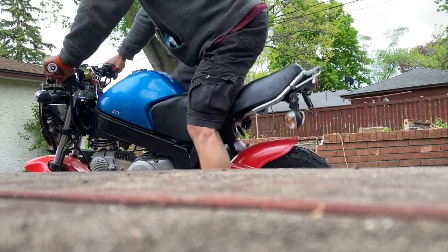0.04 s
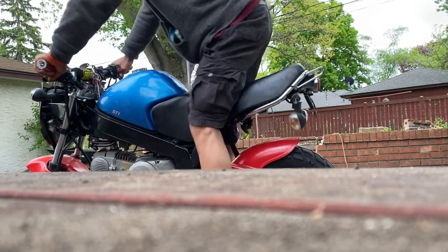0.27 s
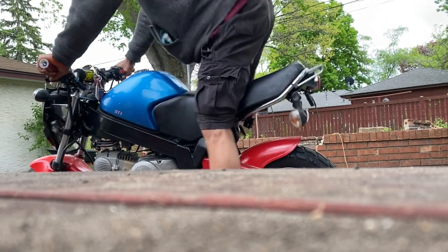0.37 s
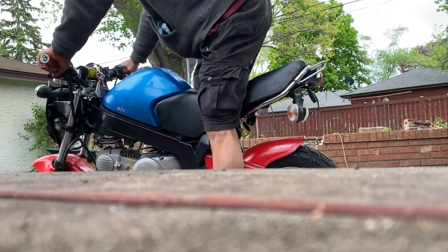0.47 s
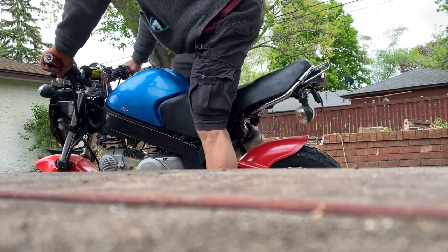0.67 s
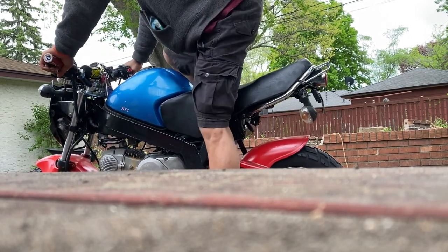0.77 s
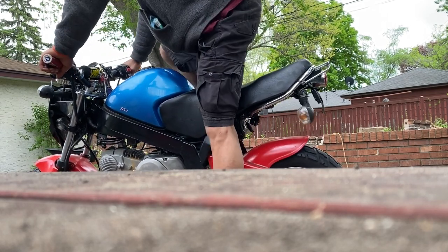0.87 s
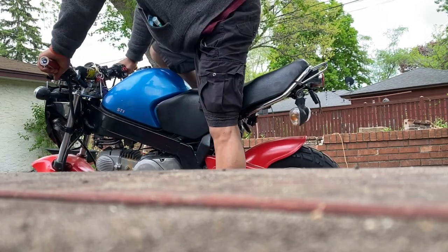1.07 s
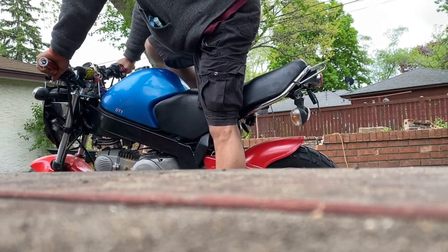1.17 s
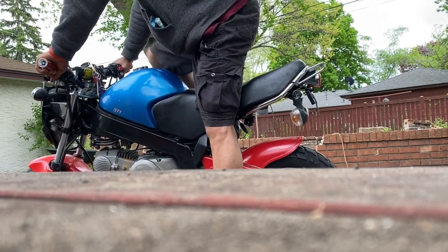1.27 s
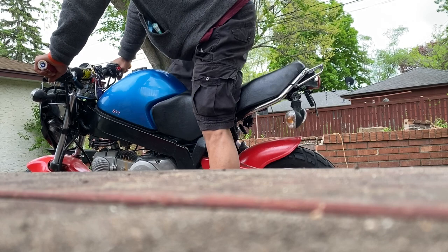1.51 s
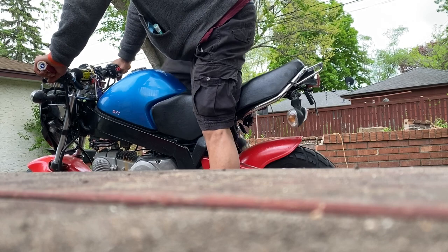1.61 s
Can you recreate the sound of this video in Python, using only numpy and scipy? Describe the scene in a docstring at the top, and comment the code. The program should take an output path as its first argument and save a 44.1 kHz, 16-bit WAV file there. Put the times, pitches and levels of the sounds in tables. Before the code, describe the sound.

Motorcycle kick-start attempt: a brief sputter, a hiss, then the lever clicking back.

```python
"""A small single-cylinder motorcycle is kicked over in a driveway. From 0.2 s six exhaust puffs boom
in the pipe over the clatter of gears, valves and ratchet. At 0.67 s it stalls and air hisses out.
From 1.2 s the kick lever clicks and scrapes back, with a second, short hiss. Throughout, a far motor
hums in the neighbourhood's low rumble. A two-port microphone lies on the ground."""
import sys
import numpy as np
from scipy import signal
from scipy.fft import rfft, irfft
from scipy.io import wavfile
from scipy.ndimage import uniform_filter1d

SR = 44100
rng = np.random.default_rng(int(sys.argv[2]) if len(sys.argv) > 2 else 0)


def log_audio(samples):
    """Write samples as a 16-bit WAV file to the path given in sys.argv[1]."""
    # one column per channel
    frames = np.atleast_2d(samples).T
    # limit to full scale, then quantise
    limited = np.clip(frames, -1, 1)
    pcm = np.round(limited * 32767).astype(np.int16)
    wavfile.write(sys.argv[1], SR, pcm)


N = 72765

# start_s, level_db, open_hz, flow_hz, outflow_s, overtone_db, ring_db, roar_db
EXHAUST_PUFFS = [(0.209, -1.5, 252, 86, 0.022, -10.5, -10.5, -15),
                 (0.278, -6, 59.6, 123, 0.03344, -13, -51, -29.5),
                 (.344, -2, 101, 92.5, .018, -11.5, -16.5, -28.5),
                 (0.4178, -4, 99, 93.1, 0.029, -9, -17, -33.5),
                 (0.52, -4.5, 83.6, 91, 0.0188, -16, -44, -45),
                 (0.6233, -7, 208.3, 99.3, 0.021, -12.5, -38, -34)]
# turbulent gas: freq_hz, gain_db
ROAR_SPECTRUM = [(88, -36), (150, -1.5), (668, -17), (735, -22), (927, -21.5), (1080, -44), (1500, -67),
                 (3300, -120)]
# gears, chain, valves: time_s, level_db, treble_db
CLATTER_ENVELOPE = [(0.0, -65.5, -3), (0.111, -42, -2.5), (0.146, -61, 3), (0.164, -50, 12),
                    (0.173, -49, 0), (0.212, -25, -0.5), (0.256, -30, 5), (0.302, -28.5, 5),
                    (0.412, -32.5, 1), (0.477, -33, 0), (0.482, -36, 2.5), (0.583, -33, -1.5),
                    (0.612, -41, 2), (0.676, -39, -0.5), (0.696, -43, -21), (0.715, -46.5, 12),
                    (0.76, -56, 5.5)]
# ratchet travel: time_s, teeth_passed
RATCHET_TEETH = [(.19, -1), (.206, 0), (.242, 2), (.272, 3), (.284, 4), (.339, 10), (.407, 16), (.474, 21),
                 (.53, 25), (.561, 27), (.598, 29)]
# broad part of the knocks: freq_hz, gain_db
KNOCK_SPECTRUM = [(240, -5), (400, -1), (1110, -11), (1670, -5.5), (4510, -15), (5570, -20), (7420, -15),
                  (9160, -34.5), (9580, -26.5), (11000, -23), (14600, -30)]
# engine case and lever: pitch_hz, width_hz, level_db
CASE_MODES = [(681, 29, -2.5), (921, 40, -3), (1668, 20, 0.5), (1736, 25, -2.5), (2147, 70, -5),
              (2235, 17, 4), (2700, 30, -2.5), (3172, 32, -3.5), (3940, 83, -12), (4560, 260, -13),
              (6150, 37, -8), (6574, 83, -12.5), (7580, 150, -17)]
# load shifts acting on nearby modes: time_s, centre_hz, half_length_s, gain_db
LOAD_SURGES = [(0.23, 935, 0.017, -2), (0.237, 3060, 0.024, 8), (0.244, 6340, 0.0065, 9),
               (0.297, 1570, 0.011, 7), (0.33, 4000, .03, 6.5), (0.375, 6160, 0.021, 11),
               (0.407, 4660, 0.013, 10), (0.454, 1880, 0.032, 13), (0.529, 6700, 0.017, 13),
               (.565, 1770, 0.023, 11.5), (0.576, 7250, 0.035, 10.5)]
# start_s, ring_db, pitch_hz, tick_db, thud_db
LEVER_CLICKS = [(0.1595, -46.5, 1480, -41, -60), (0.18, -35, 3350, -33.5, -68),
                (0.2027, -23, 2320, -35, -24.5), (0.208, -26, 7550, -27, -46), (.219, -18, 905, -52, -43),
                (.2424, -36, 6030, -59, -62), (.2723, -25, 1580, -40, -53), (.288, -41, 1660, -23, -58),
                (.3027, -18, 2430, -34, -64), (0.321, -31, 4580, -24.5, -46), (.4733, -44, 2250, -41, -60),
                (.5142, -31, 2170, -53, -66), (.5297, -22.5, 2115, -25, -70), (.5796, -35, 1624, -35, -66),
                (.622, -25.5, 428.4, -60, -66), (1.167, -46, 1667, -45, -51), (1.287, -49, 1810, -43, -75),
                (1.299, -37, 1670, -47, -39.5), (1.3312, -45, 4600, -39, -50.5),
                (1.437, -34, 927, -56, -51), (1.504, -56, 1520, -44, -50.5),
                (1.518, -42.5, 5070, -47, -48.5), (1.554, -46, 3360, -61, -82)]
# bright part of a click: freq_hz, gain_db
TICK_SPECTRUM = [(600, -14), (1500, 10.5), (4500, 3), (8000, -12), (10000, -28), (14000, -32)]
# dull part of a click: freq_hz, gain_db
THUD_SPECTRUM = [(120, -42), (250, 5.5), (650, 1), (1200, -12.5), (3000, -42)]
# returning lever: time_s, level_db
SCRAPE_ENVELOPE = [(1.352, -51.5), (1.366, -42), (1.441, -39.5), (1.46, -47.5), (1.47, -41), (1.49, -45.5),
                   (1.594, -63.5), (1.62, -69)]
# lever grit: freq_hz, gain_db
SCRAPE_SPECTRUM = [(150, -47), (250, -18), (340, 6.5), (502, -49), (595, -5), (718, -16), (943, -13.5),
                   (1220, -10.5), (1630, -6.5), (2700, -14), (3300, -24.5), (5600, -28), (6600, -12.5),
                   (7780, -24.5), (9220, -49), (9870, -25.5), (14600, -31)]
# start_s, rise_s, hold_s, level_db, t60_s
AIR_JETS = [(0.671, 0.02, 0.029, -35.5, 0.037), (1.465, 0.0067, 0.012, -43.5, 0.019)]
# escaping air: freq_hz, gain_db
HISS_SPECTRUM = [(410, -47), (700, -7), (1190, -10), (1590, -2), (2000, -4), (2220, 6), (3370, -8.5),
                 (3550, -27), (4040, -7), (4660, -31), (5520, -46), (5810, 3.5), (6200, 3.5), (9270, -13),
                 (11200, -3.5), (12000, 7.5), (12900, -6), (15000, -11), (15600, -34)]
# far traffic: freq_hz, gain_db
RUMBLE_SPECTRUM = [(15, -45), (25, -6), (86, 6), (128, 8), (196, -2.5), (231, -9.5), (309, -13),
                   (450, -18.5), (515, -18.5), (811, -15.5), (1090, -25.5), (6200, -37), (15000, -69)]
# far motor: time_s, pitch_hz
MOTOR_SPEED = [(0, 114.7), (1.1, 114.7), (1.65, 110)]
# harmonic_number, level_db
MOTOR_HARMONICS = [(1, -63.5), (2, -51), (3, -62.5), (4, -60)]
# treble limit of rattling parts: freq_hz, gain_db
RATTLE_ROLLOFF = [(14300, 0), (14800, -25)]
# stereo width: freq_hz, side_to_mid_db
BIKE_WIDTH = [(60, -36), (110, -17.5), (200, -13), (380, -7.5), (700, -3), (1290, -1.5), (2380, -7.5),
              (4400, -6), (8120, 1.5), (15000, -4.5)]
# stereo width: freq_hz, side_to_mid_db
BACKGROUND_WIDTH = [(60, -22), (110, -17), (200, -5.5), (380, -6), (700, 0), (1290, 3), (2380, -3.5),
                    (4400, -1), (8120, 3), (15000, 11)]
# side in phase with mid: freq_hz, share
SIDE_IN_PHASE = [(100, 0.058), (500, 0.29), (2000, 0.26), (8000, 0.043)]
# side due to the delay between ports: freq_hz, share
SIDE_PORT_DELAY = [(300, 1), (1000, 0.72), (4000, 0.67), (8000, 0.65), (12000, 1)]


def exhaust():
    """Each puff swells while gas flows, settles on the pipe pitch, then rings down."""
    pipe_hz, settle_s, suction_cycles = 119, 0.0059, 0.15
    rise_s, start_db, close_s, ring_t60_s = 0.0039, -2.5, 0.0035, 0.28
    roar_rise_s, roar_t60_s, lead_rad = 0.0014, 0.15, 0.36
    out, t = np.zeros((2, N)), np.arange(SR // 3) / SR
    for start_s, level_db, open_hz, flow_hz, outflow_s, overtone_db, ring_db, roar_db in EXHAUST_PUFFS:
        noise = rng.standard_normal((3, len(t)))
        hz = pipe_hz + (open_hz - flow_hz) * np.exp(-(t / settle_s) ** 2)
        hz += (flow_hz - pipe_hz) * np.exp(-(t / outflow_s) ** 2)
        phase = 2 * np.pi * (np.cumsum(hz) / SR - suction_cycles)
        tone = np.sin(phase) + amp(overtone_db) * np.sin(2 * phase + lead_rad)
        tone += amp(2 * overtone_db - 6.5) * np.sin(3 * phase + 2 * lead_rad)
        after_s = np.maximum(t - outflow_s, 0)
        attack = np.sin(np.minimum(t / rise_s, 1) * np.pi / 2) ** 2
        swell_db = start_db * np.maximum(1 - t / outflow_s, 0) ** 2
        decay_db = ring_db * (1 - np.exp(-(after_s / close_s) ** 2)) - 60 * after_s / ring_t60_s
        boom = attack * amp(level_db + swell_db + decay_db) * waver(noise[2], 0.063, 300) * tone
        roar = unit_rms(colour(noise[:2], ROAR_SPECTRUM)) * amp(roar_db - 60 * after_s / roar_t60_s)
        add(out, start_s, boom + np.minimum(t / roar_rise_s, 1) * roar)
    return out


def yard_echo(x, level_db=-11, t60_s=0.38, gap_s=0.013):
    """Adds sparse, fading reflections from the yard."""
    t = np.arange(SR // 2) / SR
    taps = rng.choice([-1., 1.], (2, len(t))) * (rng.random((2, len(t))) < .03)
    taps *= amp(-60 * t / t60_s) * (t > gap_s)
    return x + amp(level_db) * signal.fftconvolve(x[:1], taps / np.linalg.norm(taps[0]), axes=1)[:, :N]


def gear_clatter(tooth_db=26, treble_hz=3130):
    """Dense knocks and ratchet teeth strike the case; the treble comes and goes."""
    teeth = np.diff(np.floor(curve(RATCHET_TEETH)), prepend=-1) * rng.choice([-1., 1.], (2, N))
    hits = knocks(rate_per_s=1100) + amp(tooth_db) * teeth
    clatter = case_rattle(hits, KNOCK_SPECTRUM, t60_s=.02, grind_share=.5)
    time_s, level_db, treble_db = np.transpose(CLATTER_ENVELOPE + [(.85, -70, 0)])
    low = signal.sosfiltfilt(signal.butter(2, treble_hz, fs=SR, output="sos"), clatter)
    treble = amp(curve(np.c_[time_s, treble_db])) * (clatter - low)
    return amp(curve(np.c_[time_s, level_db])) * (low + treble)


def knocks(rate_per_s, spread_db=5):
    """Two independent trains of impacts, a few of them large."""
    size = amp(spread_db * np.minimum(rng.exponential(1, (2, N)), 4)) * rng.choice([-1., 1.], (2, N))
    return size * (rng.random((2, N)) < rate_per_s / SR)


def case_rattle(hits, spectrum, t60_s, grind_share, ring_db=-6.5, wander_db=2.5, surge_octaves=0.31):
    """Hits give noise bursts over steady grinding and ring modes that swell as the parts move."""
    bursts = signal.lfilter([1], [1, -amp(-60 / t60_s / SR)], abs(hits))
    broad = colour((bursts + grind_share * bursts.mean()) * rng.standard_normal((2, N)), spectrum)
    drifts = uniform_filter1d(uniform_filter1d(rng.standard_normal((len(CASE_MODES), N)), 1500), 1500)
    ring, t = np.zeros((2, N)), np.arange(N) / SR
    for (hz, width_hz, level_db), drift in zip(CASE_MODES, drifts):
        gain_db = level_db + wander_db * unit_rms(drift)
        for time_s, centre_hz, half_s, surge_db in LOAD_SURGES:
            detune = np.log2(hz / centre_hz) / surge_octaves
            gain_db += surge_db * np.exp(-((t - time_s) / half_s) ** 2 - detune ** 2)
        mode = resonate(resonate(hits, hz, width_hz), hz, 6 * width_hz)
        ring += amp(gain_db) * np.sqrt(width_hz) * unit_rms(mode)
    return unit_rms(colour(unit_rms(broad) + amp(ring_db) * unit_rms(ring), RATTLE_ROLLOFF))


def lever_clicks(rise_s=0.0025, tick_t60_s=0.036, thud_t60_s=0.24):
    """Metal impacts: a tick, a thud and an unsteady ring, longer at low pitch."""
    out, t = np.zeros((2, N)), np.arange(4000) / SR
    for start_s, ring_db, hz, tick_db, thud_db in LEVER_CLICKS:
        noise = rng.standard_normal((2, len(t)))
        tick = unit_rms(colour(noise, TICK_SPECTRUM)) * amp(tick_db - 60 * t / tick_t60_s)
        thud = unit_rms(colour(noise, THUD_SPECTRUM)) * amp(thud_db - 60 * t / thud_t60_s)
        ring_t60_s = 0.054 * np.sqrt(2000 / hz)
        ring = np.sin(2 * np.pi * (hz * t + rng.random((2, 1)))) * amp(ring_db - 60 * t / ring_t60_s)
        ring *= waver(rng.standard_normal(len(t)), .35, 150)
        add(out, start_s, np.minimum(t / rise_s, 1) * (ring + tick + thud))
    return out


def lever_scrape():
    """The returning lever grinds in tiny impacts."""
    grit = case_rattle(knocks(rate_per_s=1500), SCRAPE_SPECTRUM, t60_s=0.045, grind_share=1.5)
    return amp(curve([(1.3, -70.5)] + SCRAPE_ENVELOPE)) * grit


def air_hiss(tail_db=-11.5, tail_t60_s=0.34):
    """Jets of escaping air with a faint, long tail."""
    out, t = np.zeros((2, N)), np.arange(SR // 3) / SR
    for start_s, rise_s, hold_s, level_db, t60_s in AIR_JETS:
        after_s = np.maximum(t - rise_s - hold_s, 0)
        fade = amp(-60 * after_s / t60_s) + amp(tail_db - 60 * after_s / tail_t60_s)
        jet = unit_rms(colour(rng.standard_normal((2, len(t))), HISS_SPECTRUM))
        add(out, start_s, amp(level_db) * np.minimum(t / rise_s, 1) ** 2 * fade * jet)
    return out


def far_motor():
    """Hum of wavering harmonics; the pitch sags near the end."""
    phase = 2 * np.pi * np.cumsum(curve(MOTOR_SPEED)) / SR
    gains = waver(rng.standard_normal((len(MOTOR_HARMONICS), N)), .35, 4000)
    return sum(np.sqrt(2) * amp(db) * gain * np.sin(k * phase + k * k)
               for (k, db), gain in zip(MOTOR_HARMONICS, gains))


def traffic_rumble(level_db=-40.5):
    """Steady low noise of far traffic."""
    return amp(level_db) * unit_rms(colour(rng.standard_normal((2, N)), RUMBLE_SPECTRUM))


def amp(db):
    return 10 ** (np.asarray(db) / 20)


def unit_rms(x):
    return x / np.sqrt(np.mean(x ** 2) + 1e-20)


def waver(noise, depth, window_samples):
    return 1 + depth * unit_rms(uniform_filter1d(noise, window_samples))


def at_freq(points, hz):
    freq_hz, value = np.transpose(points)
    return np.interp(np.log(hz + 1), np.log(freq_hz + 1), value)


def curve(points):
    time_s, value = np.transpose(points)
    return np.interp(np.arange(N) / SR, time_s, value)


def colour(x, spectrum):
    n = x.shape[-1]
    return irfft(rfft(x) * amp(at_freq(spectrum, np.fft.rfftfreq(n, 1 / SR))), n)


def add(mix, start_s, sound):
    part = mix[..., round(start_s * SR):][..., :sound.shape[-1]]
    part += sound[..., :part.shape[-1]]


def resonate(x, hz, width_hz):
    r = np.exp(-np.pi * width_hz / SR)
    return signal.lfilter([1 - r, 0, r - 1], [1, -2 * r * np.cos(2 * np.pi * hz / SR), r * r], x)


def stereo(pair, width):
    """A mid signal and its twin with other noise become left and right."""
    hz, (mid, twin) = np.fft.rfftfreq(N, 1 / SR), rfft(pair)
    in_phase = np.clip(at_freq(SIDE_IN_PHASE, hz), 0, .7)
    delayed = np.clip(at_freq(SIDE_PORT_DELAY, hz), 0, .9)
    diffuse = np.sqrt(np.maximum(1 - in_phase ** 2 - delayed ** 2, 0))
    side = irfft(amp(at_freq(width, hz)) * ((in_phase + 1j * delayed) * mid + diffuse * twin), N)
    return np.array([pair[0] + side, pair[0] - side])


def scene():
    """Bike and background, each with its own width."""
    bike = yard_echo(exhaust()) + gear_clatter() + air_hiss() + lever_clicks() + lever_scrape()
    return stereo(bike, BIKE_WIDTH) + stereo(traffic_rumble() + far_motor(), BACKGROUND_WIDTH)


def record(dry):
    """Low cut, soft overload, a narrow dip near 9 kHz in the stereo centre, band limit."""
    low_cut_hz, ceiling, edge_hz = 50, 1.24, 15600
    dip_hz, dip_width_hz, dip_db = 9184, 400, -22
    low_cut = signal.butter(2, low_cut_hz, "high", fs=SR, output="sos")
    left, right = ceiling * np.tanh(signal.sosfilt(low_cut, dry) / ceiling)
    mid, side = (left + right) / 2, (left - right) / 2
    hz = np.fft.rfftfreq(N, 1 / SR)
    mid = irfft(rfft(mid) * amp(dip_db * np.exp(-((hz - dip_hz) / dip_width_hz) ** 4)), N)
    band_limit = signal.firwin(511, edge_hz, window=("kaiser", 9), fs=SR)
    return signal.oaconvolve(np.array([mid + side, mid - side]), band_limit[None], "same")


dry = scene()
out = record(dry)
log_audio(out)
```